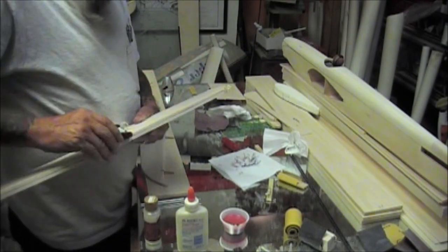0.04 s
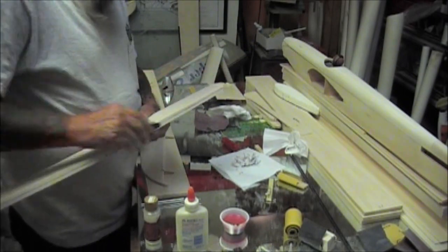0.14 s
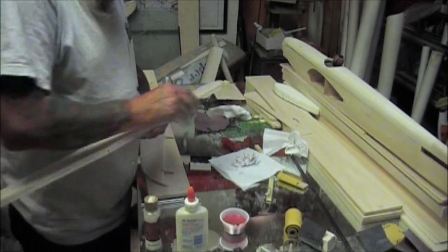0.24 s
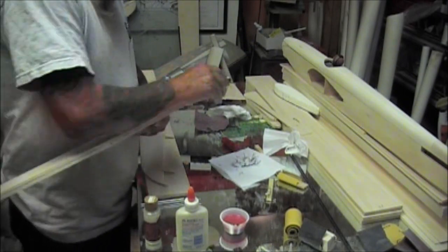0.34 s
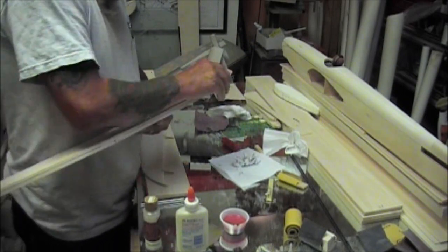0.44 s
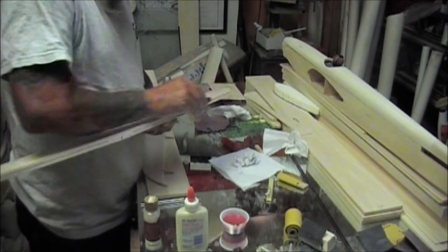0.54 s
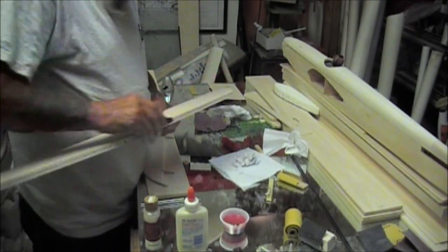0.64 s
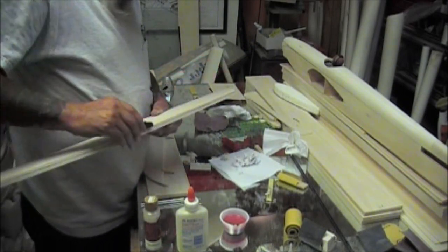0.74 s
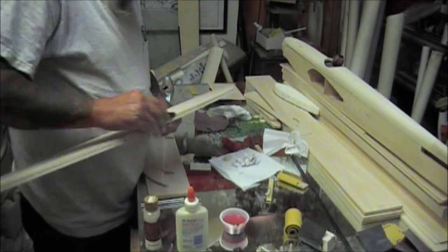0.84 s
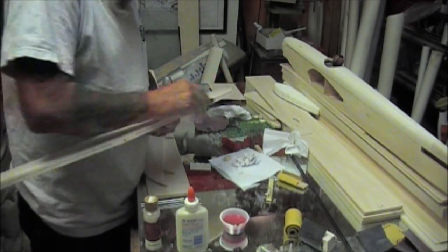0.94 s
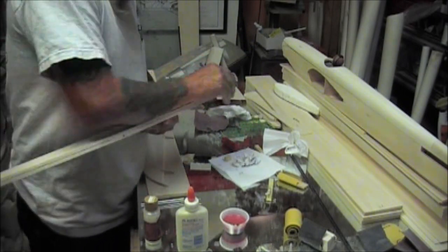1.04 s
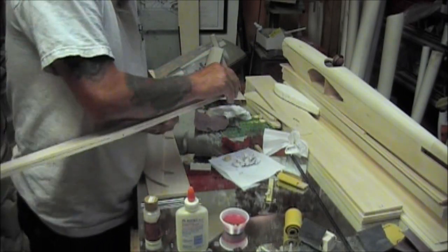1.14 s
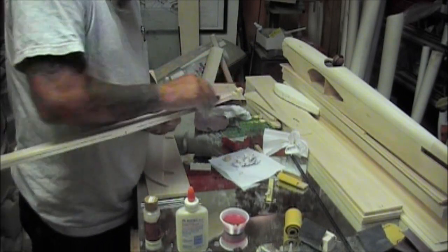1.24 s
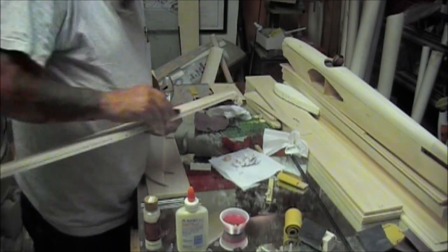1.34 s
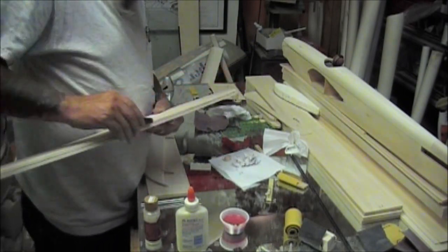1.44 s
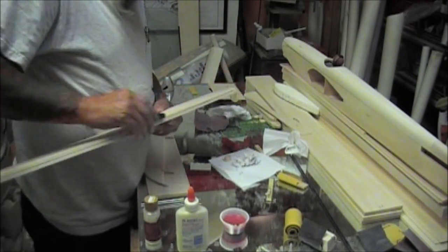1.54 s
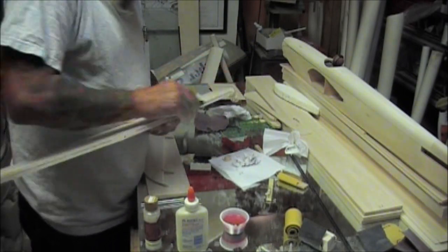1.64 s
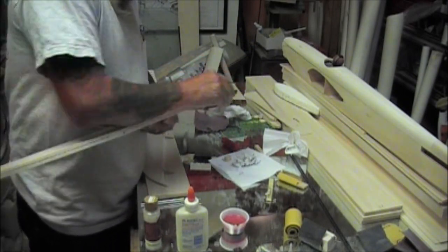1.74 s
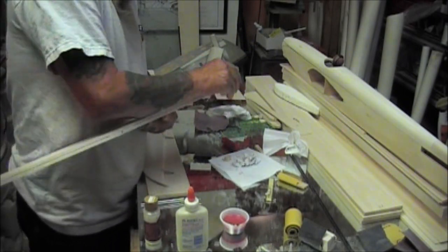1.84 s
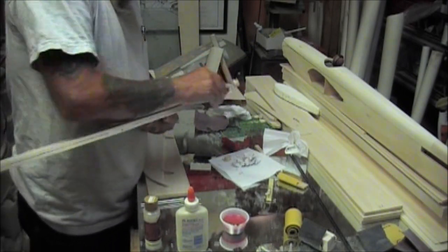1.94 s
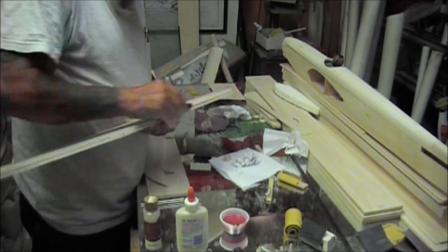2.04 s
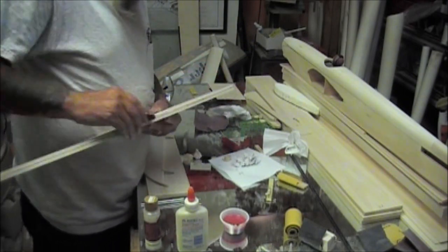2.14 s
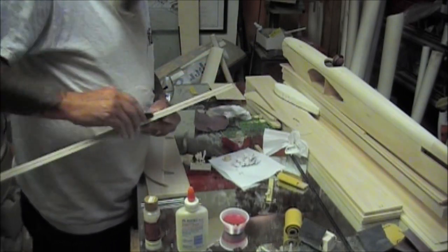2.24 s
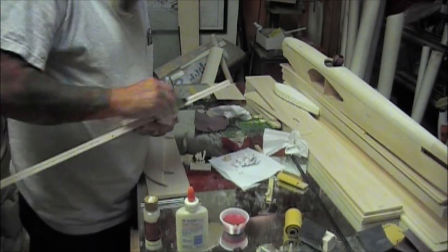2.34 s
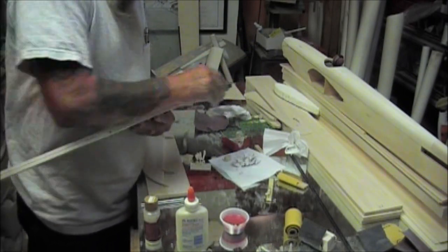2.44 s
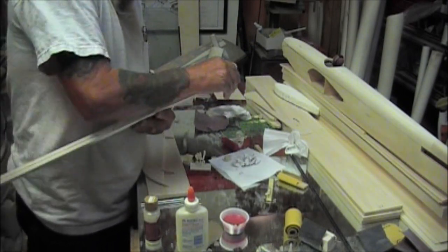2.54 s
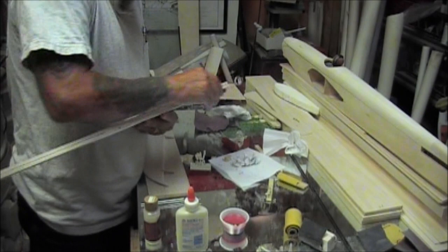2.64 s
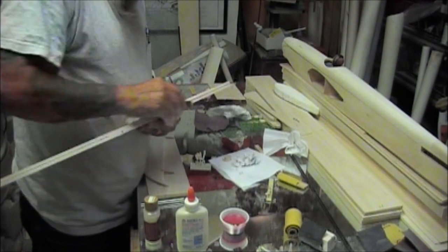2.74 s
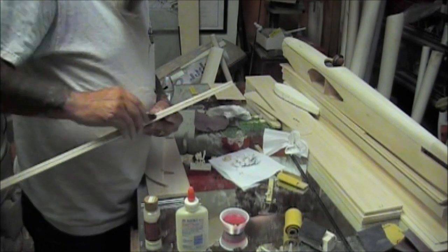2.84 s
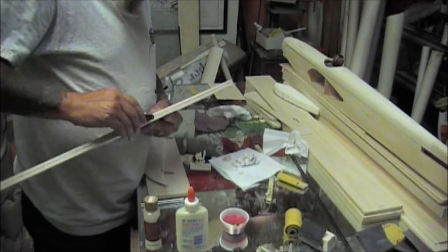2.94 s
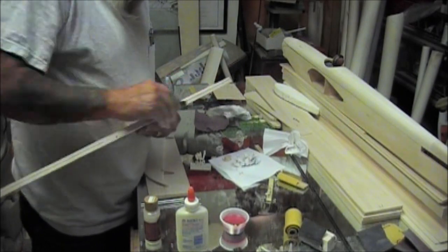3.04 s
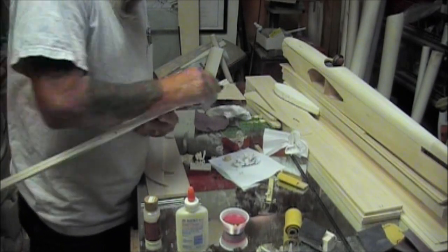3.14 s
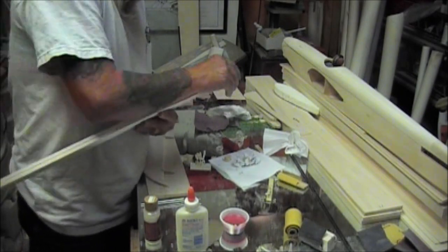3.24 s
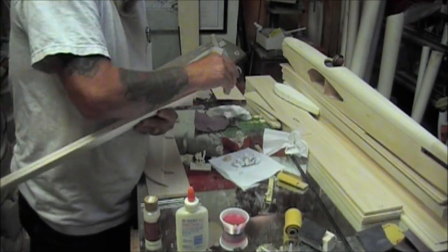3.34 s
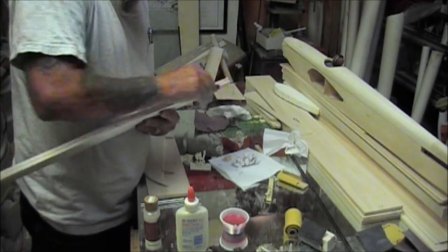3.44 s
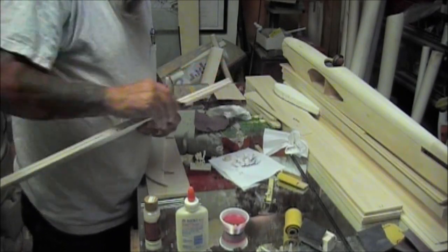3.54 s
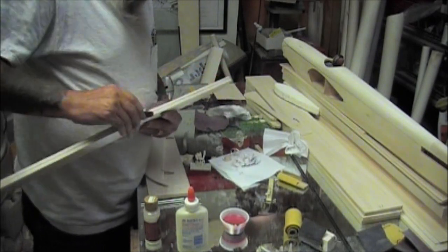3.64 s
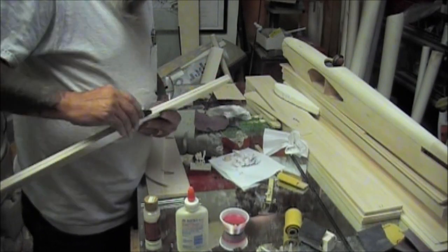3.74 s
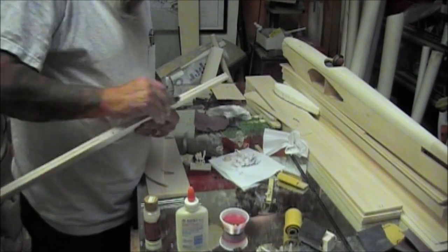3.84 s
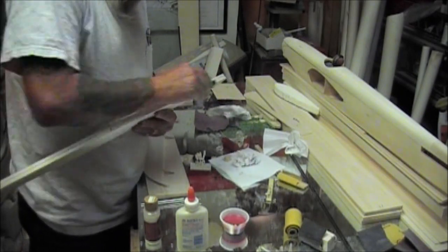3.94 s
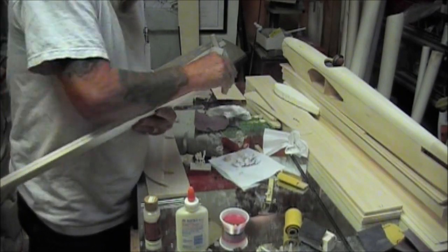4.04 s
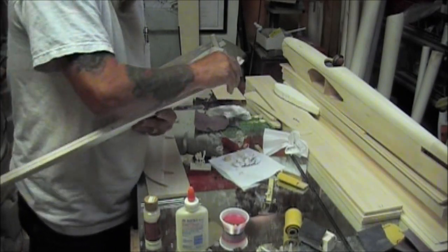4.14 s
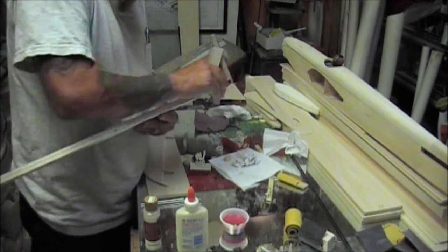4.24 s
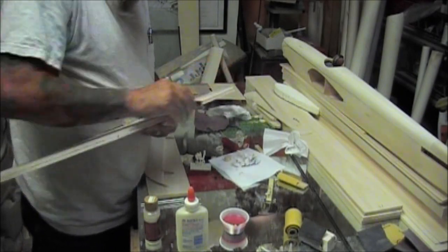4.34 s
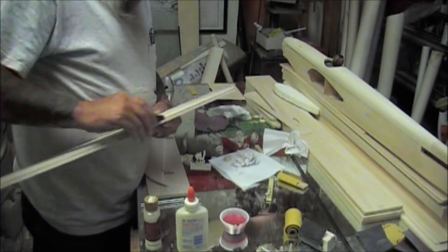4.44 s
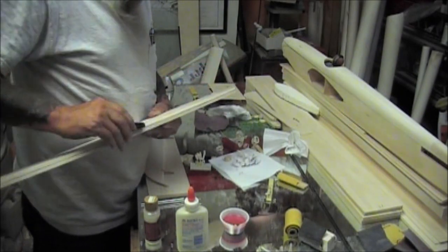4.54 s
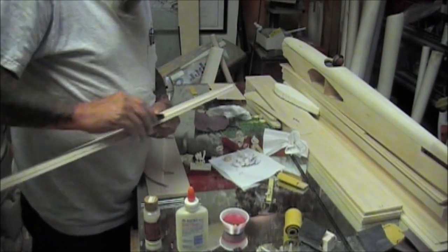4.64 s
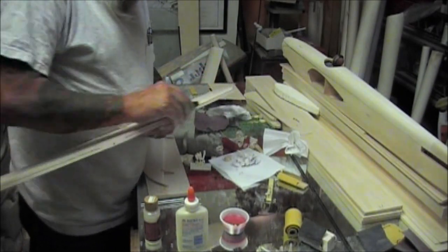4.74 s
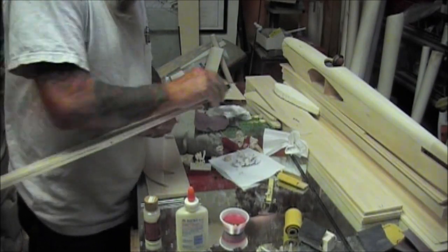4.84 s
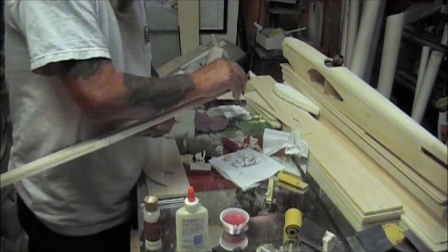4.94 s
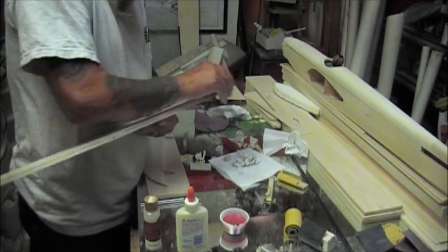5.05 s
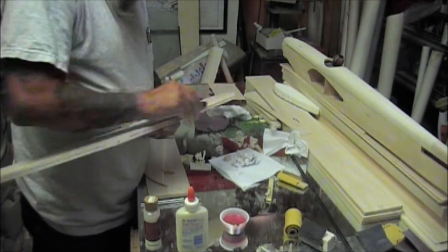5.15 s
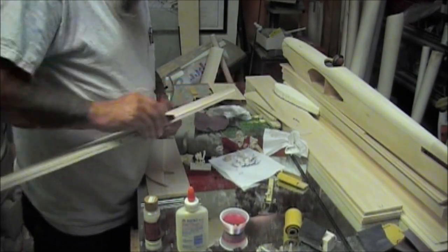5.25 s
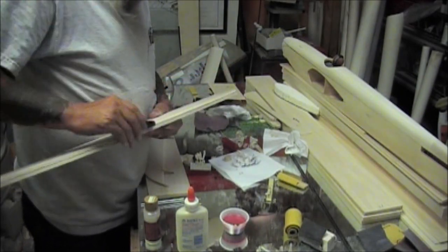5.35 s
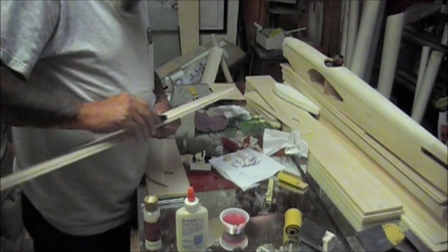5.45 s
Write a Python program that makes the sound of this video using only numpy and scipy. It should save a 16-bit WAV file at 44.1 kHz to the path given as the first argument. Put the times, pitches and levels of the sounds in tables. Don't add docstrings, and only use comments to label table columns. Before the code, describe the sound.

A small hand plane is worked along a thin wooden strip, close to the microphone. Loud pushes with grainy, tearing hiss and hollow stuttering chatter alternate with softer scraping drag-backs, a push about every 0.7 seconds. Short woody squeaks pop out at times, and the strip gives low rubbing creaks. Behind it lie soft room noise, a faint fan hum and a very distant engine. The small workshop adds a short, dry reverberation.

```python
import sys
import numpy as np
from scipy import signal
from scipy.fft import rfft, irfft, next_fast_len
from scipy.io import wavfile
from scipy.ndimage import uniform_filter1d

SR = 44100
rng = np.random.default_rng(int(sys.argv[2]) if len(sys.argv) > 2 else 0)


def magnitude_from_level(level_db):
    exponent = np.asarray(level_db, float) / 20
    return 10 ** exponent


def put_to_file(sound):
    columns = np.atleast_2d(sound).T
    safe = np.clip(columns, -1, 1)
    whole_steps = np.round(safe * 32767)
    wavfile.write(sys.argv[1], SR, whole_steps.astype(np.int16))


N = 242991
T = np.arange(N) / SR
HAND_T = np.arange(0, N / SR, 1 / 1000)


def evened(x):
    return x / np.sqrt(np.mean(x ** 2) + 1e-20)


def highpass(x, order, hz):
    return signal.sosfilt(signal.butter(order, hz, "high", fs=SR, output="sos"), x)


def read(points, hz):
    f, value = np.transpose(points)
    return np.interp(np.log(hz + 1), np.log(f + 1), value)


def colour(x, points):
    size = next_fast_len(N)
    gain = magnitude_from_level(read(points, np.fft.rfftfreq(size, 1 / SR)))
    return irfft(rfft(x, size) * gain, size)[..., :N]


def wander(hz):
    lowpass = signal.butter(2, hz, fs=SR, output="sos")
    drift = signal.sosfiltfilt(lowpass, rng.standard_normal(N + 2 * SR))
    return evened(drift[SR:-SR])


def resonate(x, hz, width):
    turn = np.exp(2j * np.pi * np.cumsum(hz * np.ones(N)) / SR)
    r = np.exp(-np.pi * width / SR)
    return 2 * (turn * signal.lfilter([1 - r], [1, -r], x * turn.conj() + 1e-18)).real


# pitch_hz, level_db [dB per Hz]
AIR = [(35, -36), (60, -13), (155, 2.5), (295, 9), (539, 9), (982, 7.5), (3420, 4), (3930, 2), (11100, -3),
       (14000, -15), (15000, -10)]


def air():
    level_db = -58 + 0.54 * wander(hz=1)
    return magnitude_from_level(level_db) * evened(colour(rng.standard_normal(N), AIR))


# pitch_hz, level_db
FAN = [(247, -73), (163, -86.5), (205, -86)]


def fan():
    hum = 0
    for hz, db in FAN:
        level = magnitude_from_level(db + 1.0 + 1.2 * wander(hz=3.9))
        hum = hum + level * np.sin(2 * np.pi * hz * T + 0.83 * wander(hz=3.5))
    return hum


# time_s, pitch_hz, level_db, half_order_db
ENGINE = [(0, 268, -103, -77.5), (.85, 266, -92, -73), (1.15, 278.5, -94, -90), (1.6, 270, -97, -72),
          (2.1, 252, -78, -90), (2.4, 256, -69, -81), (2.75, 267, -65, -104), (3.0, 272, -83, -95),
          (3.3, 278, -72, -86), (3.6, 285, -72, -86), (3.8, 282, -89, -81.5), (4.7, 270, -78.5, -87),
          (5.0, 263, -66, -84), (5.3, 258, -90, -88)]


def engine():
    s, *columns = np.transpose(ENGINE)
    hz, level_db, half_db = (np.interp(T, s, c) for c in columns)
    firing = magnitude_from_level(level_db + 3.5 * wander(hz=3.1)) * np.sin(2 * np.pi * np.cumsum(hz) / SR)
    half_order = evened(resonate(rng.standard_normal(N), hz / 2, 4.1))
    return firing + magnitude_from_level(half_db - 1.0) * half_order


def summed(shapes, db):
    rest_db = -91
    return 10 * np.log10(magnitude_from_level(np.asarray(db)) ** 2 @ np.square(shapes) + magnitude_from_level(rest_db) ** 2)


# fastest_s, speeding_up_s, slowing_s, tearing_db, fine_over_tearing_db
STROKES = [(.047, .137, .12, -40, -2.5), (0.376, .2, .22, -35, -1.1), (.755, .22, .12, -38.5, -4.5),
           (1.093, .226, .17, -32, -3), (1.441, .23, .179, -43, -1.5), (1.765, .17, .24, -32, -3),
           (2.17, .2, .12, -40.5, -2.5), (2.564, .24, .111, -33.5, -2.5), (2.802, .17, .27, -41.5, -5.5),
           (3.333, .31, .093, -36, -3), (3.648, 0.21, .11, -40, -4.5), (4.116, .28, .134, -34, -2),
           (4.541, 0.28, .16, -39, -6.5), (4.875, .2, 0.22, -33, -10), (5.31, 0.18, .19, -39, -4.5)]
# peak_s, tearing_db, rise_s, fade_s, fine_over_tearing_db
BITES = [(0.011, -35, 0.04, 0.026, -13), (0.34, -37.5, 0.053, 0.022, 4.5), (0.61, -43.5, 0.02, 0.12, -12),
         (0.724, -42.5, 0.016, 0.088, -0.5), (0.99, -40, 0.008, 0.03, -2), (1.032, -29, 0.015, 0.015, -4.5),
         (1.33, -40.4, 0.033, 0.13, -15), (1.456, -37.5, 0.05, 0.044, -3.5),
         (1.765, -28, 0.04, 0.021, -2.5), (2.085, -39.3, 0.035, 0.11, -21),
         (2.185, -35.4, 0.013, 0.037, -2), (2.468, -29.5, 0.004, 0.031, 3),
         (2.896, -34, 0.019, 0.018, -1.9), (3.189, -28, 0.022, 0.055, 0.5), (3.54, -38, 0.05, 0.025, -11),
         (3.673, -43.5, 0.0098, 0.07, -1.5), (3.89, -44.5, 0.032, 0.013, -3),
         (3.978, -31, 0.0078, 0.08, -2), (4.0, -32, 0.014, 0.018, 3.5), (4.54, -39, 0.054, 0.011, -4),
         (4.83, -31.5, 0.013, 0.01, -0.5), (5.02, -36, 0.04, 0.017, -9), (5.168, -43, 0.0076, 0.11, -27),
         (5.34, -41, 0.05, 0.068, -4.5)]


def cutting():
    t, speed_power = HAND_T, 1.546
    shapes = []
    for top, rise, fall, _, _ in STROKES:
        speed = np.sin(np.pi / 2 * np.interp(t, [top - rise, top, top + fall], [0, 1, 0]))
        shapes.append(speed ** speed_power)
    for s, _, rise, fade, _ in BITES:
        shapes.append(np.where(t < s, np.exp(-((t - s) / rise) ** 2), np.exp(-abs(t - s) / fade)))
    db = np.array([row[3] for row in STROKES] + [row[1] for row in BITES])
    tear_db = summed(shapes, db)
    fine_db = summed(shapes, db + [row[4] for row in STROKES + BITES])
    return tear_db, fine_db - tear_db


def along(drag, push):
    turns = [row[0] - row[1] for row in STROKES] + [STROKES[-1][0] + STROKES[-1][2]]
    stroke = np.interp(HAND_T, turns, np.arange(len(turns)))
    first, last = np.transpose([drag, push])[:, stroke.astype(int) % 2]
    return uniform_filter1d(first + (last - first) * (stroke % 1), size=20)


def bouts(rows, under_db, steady, sag):
    s, db, half, *traits = np.transpose(rows)[:, :, None]
    squareness = 1.77
    power = magnitude_from_level(db - 20 * np.log10(np.e) * abs((HAND_T - s) / half) ** squareness) ** 2
    under = magnitude_from_level(under_db) ** 2
    total = power.sum(0) + under
    traits = [traits[0] - sag * (HAND_T - s)] + traits[1:]
    means = [((power * v).sum(0) + under * u) / total for v, u in zip(traits, steady)]
    return [10 * np.log10(total)] + means


# middle_s, level_db, half_length_s, centre_hz, evenness [0-1]
PUSH_CHATTER = [(.285, -32.5, 0.049, 1430, 0.1), (.334, -29, 0.024, 1320, 0.3),
                (.4, -28.5, 0.045, 1290, .3), (.45, -32.5, 0.029, 1550, 0.2),
                (1.037, -27.5, 0.049, 1430, .5), (1.114, -25, 0.052, 1415, 0.22),
                (1.756, -24, 0.045, 1400, 0.8), (1.816, -25.5, 0.058, 1430, 0.2),
                (2.567, -27, 0.033, 1506, 0.68), (3.184, -32, 0.024, 1550, 0.45),
                (3.25, -25, 0.051, 1390, 0.73), (3.292, -26, 0.035, 1525, 0.43),
                (3.345, -44, 0.025, 900, .3), (3.885, -48, 0.025, 1220, 0.1),
                (3.95, -40.5, 0.0099, 1090, 0.6), (4.113, -28.5, .048, 1550, 0.56),
                (4.175, -43.5, 0.023, 900, 0.6), (4.84, -27, 0.041, 1380, 0.34),
                (4.9, -26.5, 0.053, 1300, 0.75), (4.955, -27, 0.038, 1590, .8)]
# middle_s, level_db, half_length_s, centre_hz, evenness [0-1]
DRAG_CHATTER = [(.091, -41.5, 0.033, 1480, 0), (0.75, -38, 0.036, 1400, 0.4), (0.793, -35, 0.031, 930, 1),
                (1.445, -38, 0.06, 1350, 0.2), (2.112, -35.5, 0.015, 1800, 0),
                (2.191, -38, 0.039, 1390, 0.1), (2.77, -43.5, 0.035, 1740, 0.1),
                (2.915, -43.5, 0.016, 1400, .3), (3.576, -39, 0.044, 1780, .3),
                (3.695, -44.5, .026, 1450, 0.1), (4.454, -38, 0.032, 1280, 0), (4.565, -42, 0.066, 1080, 0),
                (5.204, -40, 0.028, 2310, 0.4), (5.289, -35, 0.049, 1410, 0.26),
                (5.375, -34.5, 0.032, 1320, 0.15), (5.414, -41, 0.04, 890, 0)]


def chatter_bouts(tear_db):
    slip_hz = along(drag=(1800, 1300), push=(1400, 1550))
    return bouts(PUSH_CHATTER + DRAG_CHATTER, tear_db - 10, [slip_hz, 0.36], sag=0)


# middle_s, level_db, half_length_s, centre_hz
FLEXES = [(0.072, -55, 0.043, 603), (0.307, -43.5, 0.083, 706), (0.378, -40.8, 0.056, 780),
          (0.493, -45, 0.029, 630.0), (0.772, -47.5, 0.054, 727), (0.973, -49.5, 0.04, 610),
          (1.068, -47.8, 0.03, 725), (1.17, -53, 0.038, 615), (1.685, -56.7, 0.049, 627),
          (1.828, -48, 0.031, 680.0), (1.919, -50, 0.025, 680), (2.198, -53, 0.043, 690.0),
          (2.441, -55, 0.042, 600.0), (2.74, -56, 0.036, 543), (2.907, -52, 0.044, 660),
          (3.325, -44.5, 0.03, 780), (3.363, -49.5, 0.039, 510), (3.538, -52, 0.032, 660),
          (4.15, -43.5, 0.029, 780), (4.186, -45.5, 0.031, 510), (4.46, -51.5, 0.053, 684),
          (4.577, -47.5, 0.047, 625), (4.79, -48.5, 0.031, 500), (4.836, -46.2, 0.051, 690.0),
          (5.038, -48.5, 0.015, 670), (5.197, -47, 0.034, 670.0), (5.382, -47.5, 0.066, 640),
          (5.43, -49.5, 0.03, 517)]


def flex_bouts(tear_db):
    return bouts(FLEXES, tear_db - 30, [630], sag=1300)


def spread(*controls):
    return [np.interp(T, HAND_T, c) for c in controls]


def fibres(per_s, spread_db, lumpy_db):
    size = magnitude_from_level(spread_db * np.minimum(rng.exponential(1, N), 4))
    snaps = size * (rng.random(N) < per_s / SR)
    return evened(snaps * rng.standard_normal(N) * magnitude_from_level(lumpy_db * wander(hz=88)))


def patchy(x, depth_db):
    z = signal.stft(x, nperseg=512)[2]
    patches = uniform_filter1d(rng.standard_normal(z.shape), size=2, axis=0)
    patches = uniform_filter1d(patches, size=7, axis=1)
    return signal.istft(z * magnitude_from_level(depth_db * evened(patches)), nperseg=512)[1][:N]


# pitch_hz, level_db [dB per Hz]
TEAR = [(290, -34), (500, -20.5), (586, -42.5), (657, -17.5), (1140, -7), (1290, -6), (2540, -4),
        (2770, -2.5), (3200, -9), (4210, -3.5), (5860, -6.5), (10900, -4.5), (15600, -20)]


def tearing(tear_db, fine_db, scrape_hz):
    hiss = colour(fibres(per_s=24000, spread_db=0.03, lumpy_db=0.42), TEAR)
    hiss = patchy(hiss, depth_db=3.0)
    scrape = resonate(resonate(hiss, scrape_hz, 860), scrape_hz, 1180)
    hiss = hiss + magnitude_from_level(-3 + 0.089 * (tear_db + 34)) * scrape
    fine = signal.sosfiltfilt(signal.butter(2, 6200, "high", fs=SR, output="sos"), hiss)
    coarse = evened(hiss - fine) * magnitude_from_level(tear_db + 0.83)
    return coarse + evened(fine) * magnitude_from_level(tear_db + fine_db - 0.97)


# pitch_hz, width_hz, level_db
STRIP = [(372, 52, 5.5), (542.6, 15.5, 7.5), (733, 36, -4), (752, 4.5, 0), (834.6, 15.7, 11.5),
         (957.4, 21, 17), (1064, 24, 8.5), (1260, 77, 8.5), (1347, 73, 3), (1421, 59, 5.5),
         (1519.4, 44, 2.5), (1687, 15.6, 9), (1825, 61, 2.5), (2032, 91, 7.5)]


def strip(x, modes, through_db):
    out = magnitude_from_level(through_db) * x
    for k, (hz, width, db) in enumerate(STRIP[:modes]):
        out = out + (-1) ** k * magnitude_from_level(db) * resonate(x, hz, width)
    return out


def played(drive, level_db, modes, through_db):
    power = strip(drive, modes, through_db) ** 2
    power = uniform_filter1d(uniform_filter1d(power, size=2200), size=2200)
    steady = np.sqrt(abs(power) + 1e-12)
    return strip(drive * magnitude_from_level(level_db) / steady, modes, through_db)


def chatter(level_db, hz, even):
    slips = fibres(per_s=5000, spread_db=1.5, lumpy_db=1.3)
    for width in (1000, 1120, 1320):
        slips = resonate(slips, hz, width)
    narrow = resonate(resonate(slips, hz, 670), hz, 780)
    even = np.clip(even, 0, 1)
    slips = (1 - even) * evened(slips) + even * evened(narrow)
    slips = highpass(patchy(slips, depth_db=3.5), 3, 780)
    return played(slips, level_db + 0.32, modes=len(STRIP), through_db=-4.5)


def flexing(level_db, hz):
    rubs = fibres(per_s=1800, spread_db=6.5, lumpy_db=1.0)
    rubs = resonate(resonate(rubs, hz, 197), hz, 276)
    return played(rubs, level_db - 0.6, modes=4, through_db=-6.5)


def plane():
    tear_db, fine_db = cutting()
    chatter_controls = spread(*chatter_bouts(tear_db))
    flex_controls = spread(*flex_bouts(tear_db))
    scrape_hz = along(drag=(3300, 3750), push=(3450, 3190))
    cut = tearing(*spread(tear_db, fine_db, scrape_hz))
    cut = cut + chatter(*chatter_controls) + flexing(*flex_controls)
    return highpass(cut, 4, 300)


# middle_s, pitch_hz, level_db, half_length_s
SINGS = [(0.07, 940, -50, 0.069), (0.328, 950, -29.5, 0.013), (0.805, 940, -30, 0.026),
         (1.654, 1200, -35.5, 0.0047), (3.166, 1430, -31, 0.012), (3.363, 410, -48, 0.02),
         (3.941, 950, -39, 0.0076), (4.561, 400, -47.5, 0.017), (4.583, 951, -36.5, 0.014),
         (4.817, 945, -23, 0.018), (5.437, 975, -55, 0.021)]


def sings():
    shake = wander(hz=40)
    tones = 0
    for s, hz, db, half in SINGS:
        swell = magnitude_from_level(db + 1.3 * shake) * np.exp(-((T - s) / half) ** 2)
        tones = tones + swell * np.sin(2 * np.pi * hz * T + 0.5 * shake)
    return tones


def tail(decays, start):
    taps = np.zeros(SR // 2)
    at = np.arange(start, SR // 2 - 20, 20)
    taps[at + rng.integers(0, 20, len(at))] = rng.choice([-1., 1.], len(at))
    hz, t, z = signal.stft(taps, SR, nperseg=128)
    decay = magnitude_from_level(-60 * t / read(decays, hz)[:, None])
    taps = signal.istft(z * decay, SR, nperseg=128)[1]
    return taps / np.linalg.norm(taps)


# pitch_hz, t60_s
WALLS = [(300, 0.084), (1500, 0.16), (6000, 0.13), (14000, 0.055)]


def room(near):
    return magnitude_from_level(-15.0) * signal.fftconvolve(near, tail(WALLS, start=300))[:N]


# pitch_hz, side_over_mid_db
WIDTH = [(60, -13), (150, -12.5), (400, -21.5), (750, -21.5), (1050, -20), (1400, -25.5), (2400, -19),
         (4000, -16), (6000, -10), (9000, -7), (15000, -3)]
# pitch_hz, left_over_right_db
LEAN = [(60, -1), (240, 0), (950, -1), (3770, -0.5), (15000, -2)]


def two_ports(mid):
    turn = 2 * np.pi * 8.1 * T
    decays = [(300, 0.25), (9000, 0.12)]  # (Hz, t60 s)
    side = sum(signal.fftconvolve(mid * w, tail(decays, start=0))[:N] for w in (np.sin(turn), np.cos(turn)))
    side = colour(side, WIDTH)
    left = colour(mid + side, [(hz, db / 2) for hz, db in LEAN])
    right = colour(mid - side, [(hz, -db / 2) for hz, db in LEAN])
    return np.array([left, right])


def scene():
    near = plane() + sings()
    return two_ports(near + room(near) + air() + fan() + engine())


def top_cut(x):
    return signal.sosfilt(signal.butter(12, 15820, fs=SR, output="sos"), x)


def record(dry):
    thin = highpass(dry, 2, 80)
    thin = signal.oaconvolve(thin, signal.firwin(511, 15700, fs=SR)[None], "same")
    return top_cut(thin)


dry = scene()
out = record(dry)
put_to_file(out)
```